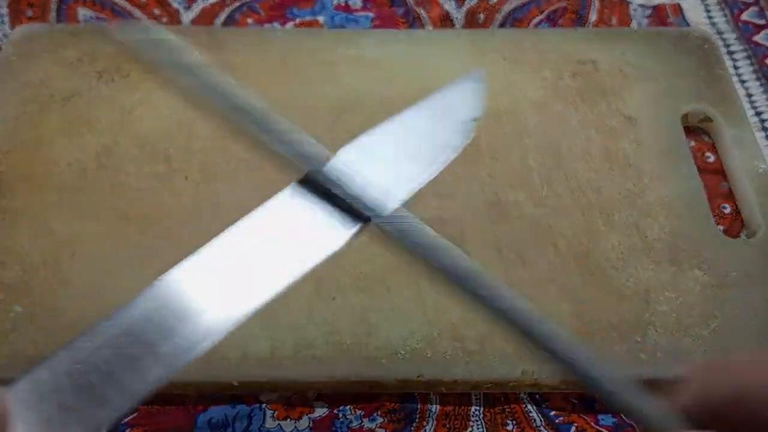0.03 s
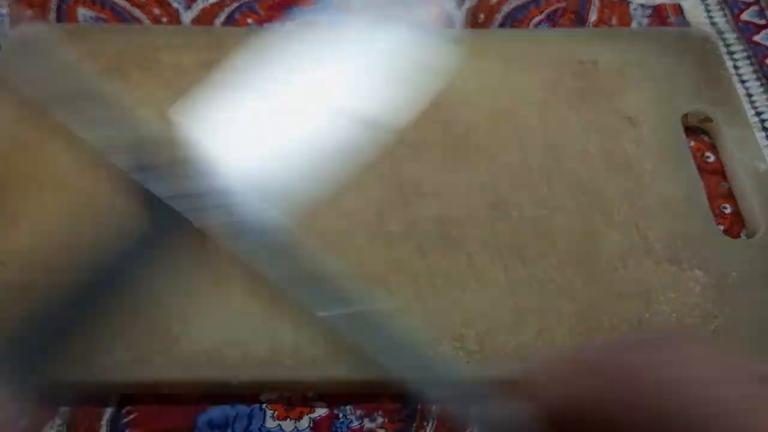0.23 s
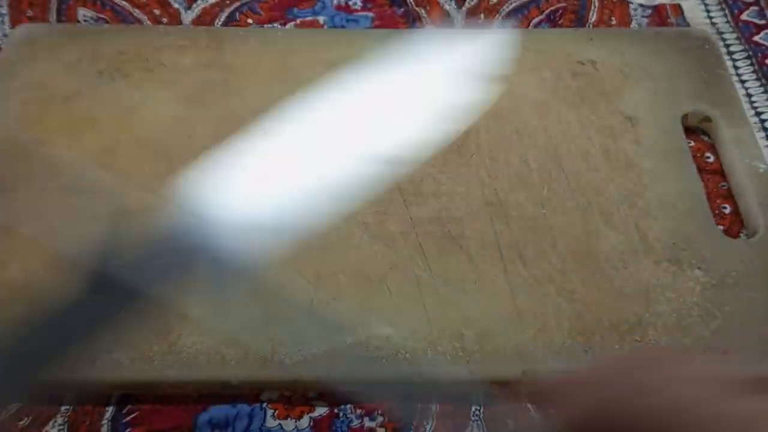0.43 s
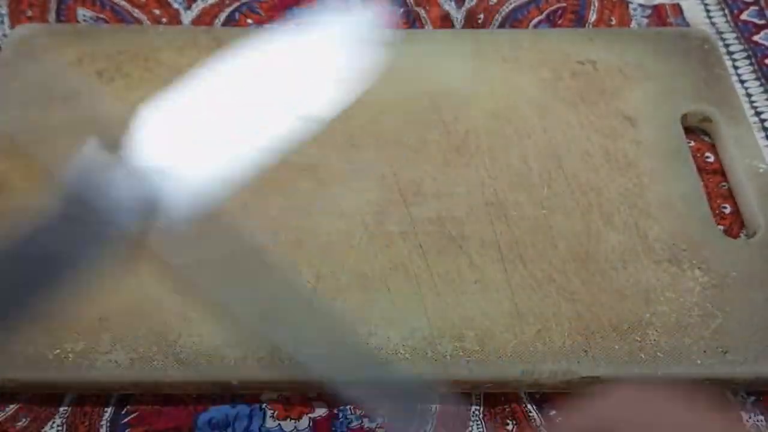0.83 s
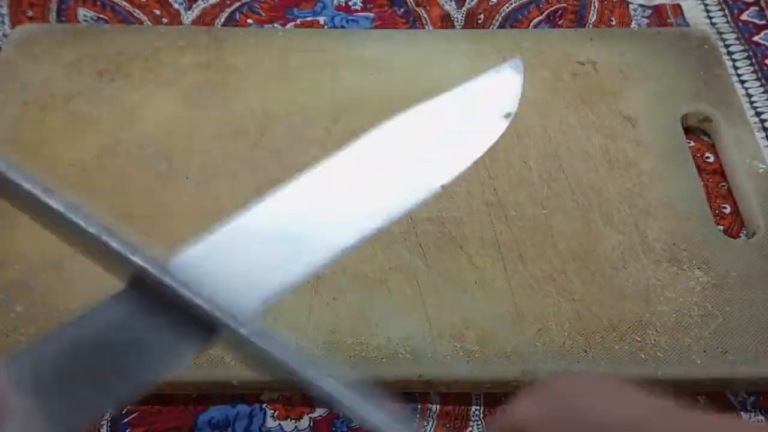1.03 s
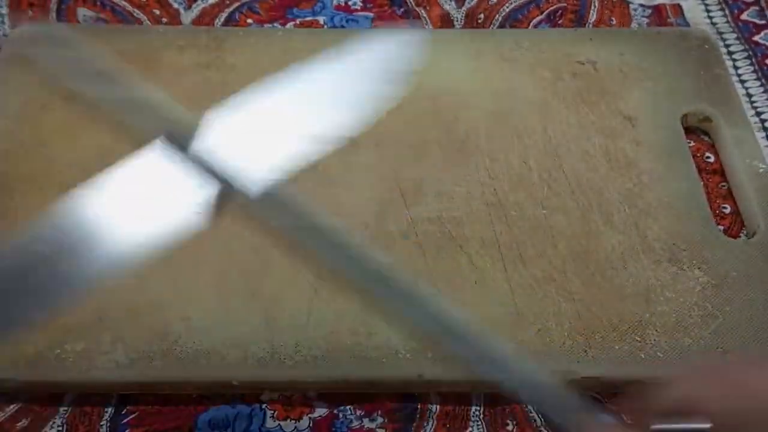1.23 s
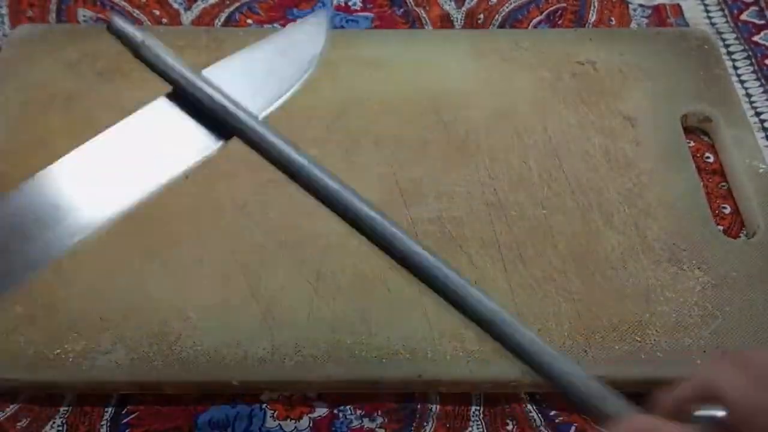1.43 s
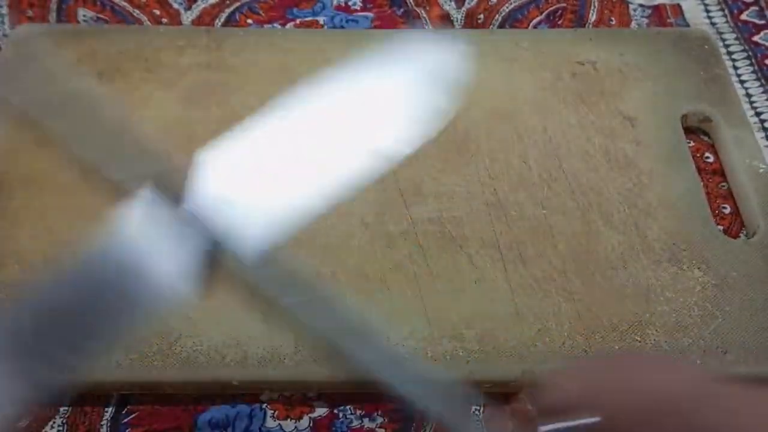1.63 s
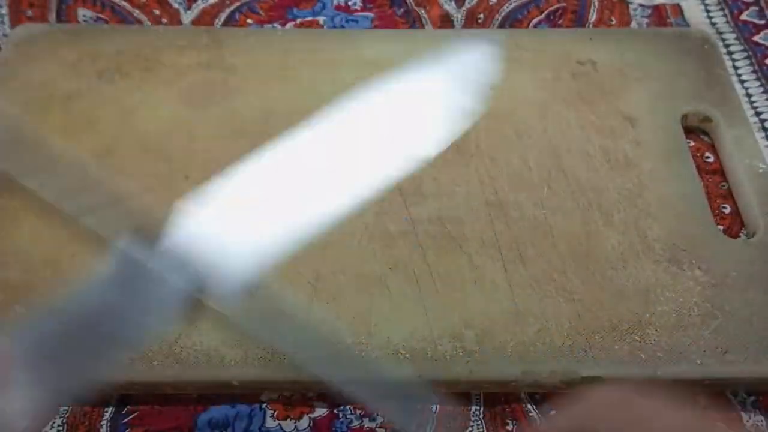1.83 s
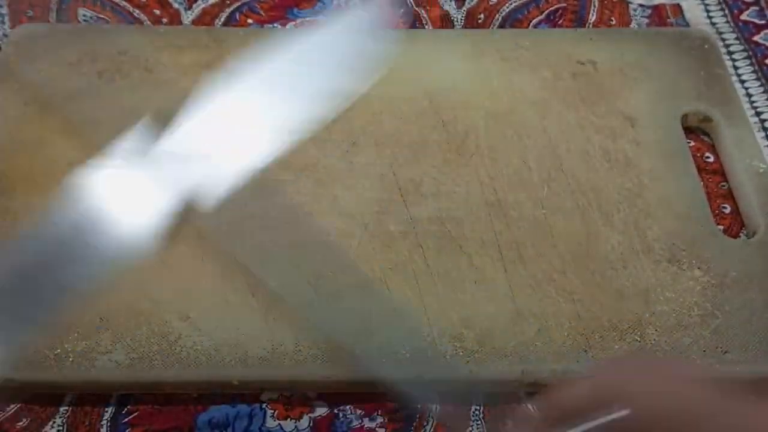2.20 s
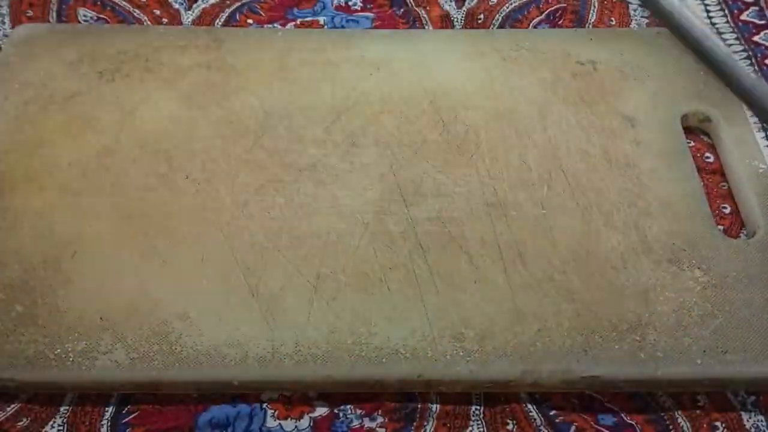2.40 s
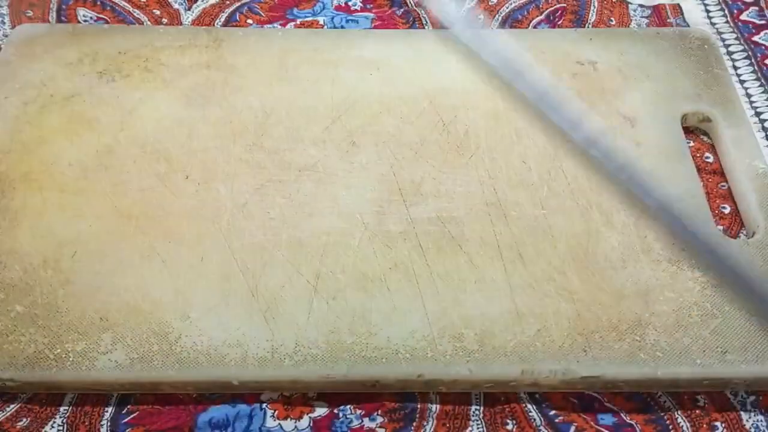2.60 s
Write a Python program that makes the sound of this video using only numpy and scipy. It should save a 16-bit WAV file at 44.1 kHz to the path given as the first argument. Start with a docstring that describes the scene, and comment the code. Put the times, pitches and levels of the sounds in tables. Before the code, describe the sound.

Quick, rasping metal strokes of a knife being honed on a steel, with scattered clicks and zings, heard up close over faint kitchen room noise. It ends with a sharp clack and a brief ring as the blade comes free.

```python
"""A small kitchen, close by: a knife is stroked quickly up and down a honing steel.
Tiny slips of the edge ring the blade's fixed resonances and the steel's gliding ones, which follow
the point of contact. The edge knocks, squeals and zings now and then; the held tools hum and thud.
The blade leaves the steel with a clack and a short ring, over faint room noise."""
import sys
import numpy as np
from scipy import signal
from scipy.fft import rfft, irfft
from scipy.io import wavfile
from scipy.ndimage import uniform_filter1d

SR = 44100
rng = np.random.default_rng(int(sys.argv[2]) if len(sys.argv) > 2 else 0)


def to_wav(sig):
    """Store sig (one row per channel, or 1-D mono) as 16-bit WAV at the path in sys.argv[1].

    Samples outside -1..1 are clipped; the rate is SR.
    """
    pcm = np.clip(np.atleast_2d(sig), -1, 1) * 32767
    pcm = np.round(pcm).astype(np.int16)
    wavfile.write(sys.argv[1], SR, pcm.T)  # frames by channels


N = 121275
t = np.arange(N) / SR

# still-air spectrum: f/Hz, relative density/dB
AIR_SPECTRUM = [(25, -5), (60, -15.5), (110, -3), (200, -4.5), (350, -3.5), (550, -12), (900, -13.5),
                (3000, -21), (15000, -48)]
# kitchen decay: f/Hz, T60/s
ROOM_DECAY = [(200, 0.2), (1000, 0.36), (3500, 0.44), (7000, 0.41), (11000, 0.45), (15000, 0.11)]
# jolts from the hands: t/s, level/dB
THUDS = [(.43, -64.5), (1.02, -66), (1.671, -49), (1.825, -61), (1.86, -58), (2.116, -68), (2.42, -63)]
# low resonances of the held tools: centre t/s, half length/s, f/Hz, level/dB
HUMS = [(.03, 0.076, 361, -68), (.18, 0.013, 796, -52), (.365, 0.018, 403, -52.5), (.665, 0.019, 332, -54),
        (.84, 0.015, 641, -58), (1.16, 0.044, 575, -61.5), (1.4, 0.025, 690, -55.5),
        (1.35, .06, 524.4, -52.5), (1.88, .03, 527, -59), (2.42, 0.061, 338, -58.5),
        (2.433, 0.011, 596.5, -38.5), (2.465, 0.027, 655, -48.5)]
# modes of the freed blade and steel: f/Hz, level/dB, T60/s
FREE_MODES = [(658, -41, .19), (1093, -52, .2), (2180, -47, .25), (2562, -50, .33), (3408, -47, .36),
              (3705, -46, .28), (3845, -42, .34), (4551, -59, 1.1), (6250, -47, .34), (7106, -53, .22),
              (7935, -54, .27), (8350, -62, .9), (11300, -55, .2), (13580, -61, .2)]
# edge catches: centre t/s, half length/s, f/Hz, level/dB
SQUEALS = [(.207, .013, 1370, -29.5), (.43, 0.005, 3700, -16), (.552, 0.0031, 3930, -43),
           (.70, 0.0087, 2260, -21.5), (.742, 0.0032, 3620, -14.5), (.945, 0.011, 2260, -27.5),
           (1.437, 0.0061, 3520, -27.5), (1.503, 0.01, 3520, -34), (1.673, 0.0031, 3950, -17),
           (1.738, .02, 2270, -39.5), (1.777, 0.0071, 2300, -23), (2.112, 0.0057, 3780, -22),
           (2.3825, 0.0038, 3780, -18), (2.407, 0.0059, 8000, -22.5)]
# hand reversals: t/s, main gliding mode f/Hz
TURNS = [(.16, 6200), (.335, 2150), (.487, 7400), (.645, 2000), (.79, 6500), (.925, 2220), (1.085, 6300),
         (1.205, 2650), (1.33, 6800), (1.475, 2450), (1.62, 7000), (1.755, 2100), (1.88, 7800),
         (2.03, 2350), (2.172, 6400), (2.305, 2150), (2.445, 7000)]
# main gliding mode locks: centre t/s, half length/s, level/dB
ZINGS = [(.522, .012, -36), (.85, .015, -34), (1.04, .01, -33), (1.39, .012, -35), (1.552, .016, -31),
         (1.832, .012, -31), (1.942, .011, -36)]
# broad blade response: f/Hz, relative level/dB
BLADE_COLOUR = [(40, -31), (250, -28), (480, -24.5), (700, -21.5), (880, -5), (1200, -7.5), (1620, -10.5),
                (2000, 2), (2800, 4.5), (4200, 5), (5100, 2.5), (7200, -5), (8500, -6.5), (9800, -14),
                (13000, -14), (16000, -14.5)]
# fixed blade resonances: f/Hz, width/Hz, lift/dB
BLADE_MODES = [(1040, 125, 5.5), (1413, 55, 16.5), (1864, 54, 1.5), (2281, 111, 8.5), (3096, 20, 1),
               (3546, 320, 6), (3754, 102, 2), (5750, 200, 8.5), (6560, 240, 8), (6750, 146, 8.5),
               (7760, 470, 4), (9030, 120, 6.5)]
# edge hits steel: t/s, relative level/dB, low-band offset/dB, hiss offset/dB
KNOCKS = [(.1002, -20.5, 13, 2.5), (.1955, -40.5, 3, -7), (.285, -26, -5, -5.5), (.427, -14.5, 18.5, -17),
          (.447, -21, 3, -21), (.5492, -24, -20, -5), (.57, -30, -11, -7), (.7357, -11, 18, -10),
          (.7997, -23, -9, 6), (.823, -38, 2, -5), (.8365, -28, 19, -25), (1.011, -15, 8.5, 0),
          (1.0815, -17.5, -5, 12), (1.2272, -11, -2, -15), (1.259, -18, 15, 4), (1.2925, -13, 6, 9),
          (1.3565, -25.5, -18, -1), (1.6285, -41, -12, -9.5), (1.6711, -22, -3, -10), (1.7235, -11, 2, -2),
          (1.7715, -14.5, 10.5, -5), (1.858, -14, -17, 12.5), (2.109, -23.5, -0.5, -1),
          (2.3347, -33.5, 19, -11), (2.4205, -17, -6.5, -1), (2.4239, -5.5, 5, 8), (2.4271, -5, -5.5, -4.5)]
# gliding steel modes: ratio to main mode, width/Hz, relative level/dB
STEEL_MODES = [(.29, 40, -7), (.51, 40, -6), (1, 45, -2), (1.56, 60, -8), (2.08, 70, -8), (2.95, 90, -7)]
# strokes: start t/s, swell end t/s, end t/s, bite time/s, relative bite level/dB,
# relative swell level/dB, low-band offset/dB, hiss offset/dB
STROKES = [(0.164, 0.18, .19, .008, -57, -45.5, -5, -3), (0.19, 0.229, 0.35, 0.0077, -31.5, -32, 5, 6.5),
           (0.346, 0.44, 0.5, .025, -35.5, -22.5, 11, 5), (0.508, 0.545, 0.65, 0.01, -31.5, -21.5, 9, 3.5),
           (0.647, 0.757, 0.76, 0.033, -32.5, -21, 3, 7.5),
           (0.795, 0.871, 0.91, 0.0035, -26, -29.5, 5.5, 0), (0.928, 1.05, 1.048, 0.03, -31.5, -25.5, 1, 7),
           (1.065, 1.088, 1.242, 0.03, -27, -25.5, 1.5, 5.5),
           (1.209, 1.32, 1.322, 0.017, -28, -24.5, -4, 1.5),
           (1.346, 1.346, 1.47, 0.013, -25, -26.5, 3.5, 3.5), (1.482, 1.559, 1.61, 0.011, -43, -25.5, 6, 2),
           (1.62, 1.642, 1.784, 0.0067, -30.5, -25.5, 0.5, 3),
           (1.762, 1.789, 1.837, 0.012, -28, -21, 1.5, 1.5),
           (1.816, 1.853, 1.895, .01, -29.5, -24, -1.5, 0),
           (1.899, 1.987, 2.029, 0.031, -29.5, -31, 7.5, -0.5),
           (2.037, 2.13, 2.164, 0.013, -38, -25, 6.5, -0.5),
           (2.19, 2.264, 2.302, 0.016, -29.5, -29, 5.5, -4.5),
           (2.32, 2.391, 2.486, .015, -37.5, -23.5, 5.5, 3)]

MID_PITCH_HZ = 3700


def amp(db):
    """Decibels to gain."""
    return 10 ** (np.asarray(db) / 20)


def unit(x):
    """Scale to rms 1."""
    return x / np.sqrt(np.mean(x ** 2) + 1e-20)


def log_interp(points, hz):
    """Table lookup on a log-frequency axis."""
    f, value = np.transpose(points)
    return np.interp(np.log(hz + 1), np.log(f + 1), value)


def slow_noise(cutoff_hz, shape=N):
    """Low-passed noise, rms 1."""
    lowpass = signal.butter(2, cutoff_hz, fs=SR, output="sos")
    return unit(signal.sosfilt(lowpass, rng.standard_normal(shape)))


def resonate(x, hz, width_hz):
    """Resonator tracking the pitch hz."""
    carrier = np.exp(2j * np.pi * np.cumsum(hz * np.ones(len(x))) / SR)
    pole = np.exp(-np.pi * width_hz / SR)
    return 2 * (carrier * signal.lfilter([1 - pole], [1, -pole], x / carrier + 1e-18)).real


def split_bands(x, low_hz=1506, hiss_hz=7740):
    """Low, middle and hiss bands; they sum to x."""
    hz, spectrum = np.fft.rfftfreq(N, 1 / SR), rfft(x)
    low = irfft(spectrum / (1 + (hz / low_hz) ** 8), N)
    hiss = irfft(spectrum * (1 - 1 / (1 + (hz / hiss_hz) ** 8)), N)
    return low, x - low - hiss, hiss


def pulse(centre_s, half_s):
    """Gaussian envelope, 1/e at half_s from the centre."""
    return np.exp(-((t - centre_s) / half_s) ** 2)


def wavering_tones(table, width_hz):
    """Brief tones with random-walk phase."""
    out = np.zeros(N)
    for centre_s, half_s, hz, db in table:
        on = abs(t - centre_s) < 3 * half_s
        drift = np.cumsum(rng.standard_normal(N)[on]) * np.sqrt(2 * np.pi * width_hz / SR)
        phase = 2 * np.pi * hz * t[on] + uniform_filter1d(drift, size=100)
        out[on] += amp(db) * np.sqrt(2) * pulse(centre_s, half_s)[on] * np.sin(phase)
    return out


def air(level_db=-73.5):
    """Faint steady room noise."""
    gain = amp(log_interp(AIR_SPECTRUM, np.fft.rfftfreq(N, 1 / SR)))
    return amp(level_db) * unit(irfft(rfft(rng.standard_normal(N)) * gain, N))


def kitchen_reverb(x, gap_s=0.0033):
    """Short diffuse tail; each band decays at its own rate."""
    hz, age_s, noise = signal.stft(rng.standard_normal(SR // 2), SR, nperseg=256)
    tail = signal.istft(noise * amp(-60 * age_s / log_interp(ROOM_DECAY, hz)[:, None]), SR)[1]
    tail *= np.clip(t[:len(tail)] / gap_s - 1, 0, 1)
    return signal.fftconvolve(x, tail / np.linalg.norm(tail))[:N]


def thuds():
    """Soft low bumps through the handles."""
    return slow_noise(cutoff_hz=87.8) * sum(amp(db) * pulse(at_s, half_s=.012) for at_s, db in THUDS)


def hums():
    """Dull low resonances of the held tools."""
    return wavering_tones(HUMS, width_hz=21)


def release_ring(release_s=2.425):
    """Free modes decay once the blade leaves the steel."""
    age_s = np.maximum(t - release_s, 0)
    return sum(amp(db - 60 * age_s / t60_s) * np.sin(2 * np.pi * hz * age_s)
               for hz, db, t60_s in FREE_MODES)


def squeals():
    """The edge catches and squeals briefly."""
    return wavering_tones(SQUEALS, width_hz=38)


def contact_pitch_hz():
    """The contact swings smoothly between turns; pitch goes as 1 / free length squared."""
    turn_s, hz = np.transpose(TURNS)
    index = np.arange(len(turn_s))
    progress = np.interp(t, turn_s, index)
    eased = np.floor(progress) + (1 - np.cos(np.pi * (progress % 1))) / 2
    free_length = np.interp(eased, index, hz ** -.5)
    return free_length ** -2


def zings(flutter_depth=0.79):
    """The main gliding mode locks into a fluttering whistle."""
    phase_flutter, gain_flutter = flutter_depth * slow_noise(cutoff_hz=146, shape=(2, N))
    tone = np.sin(2 * np.pi * np.cumsum(contact_pitch_hz()) / SR + phase_flutter) * (1 + gain_flutter)
    return unit(tone) * sum(amp(db) * pulse(at_s, half_s) for at_s, half_s, db in ZINGS)


def blade(force):
    """Force rings the blade's fixed resonances: minimum-phase filter, unit energy."""
    hz = np.fft.rfftfreq(8192, 1 / SR)
    peaks = sum((amp(db) ** 2 - 1) / (1 + (2 * (hz - mode_hz) / width_hz) ** 2)
                for mode_hz, width_hz, db in BLADE_MODES)
    gain = amp(log_interp(BLADE_COLOUR, hz)) * np.sqrt(1 + peaks)
    log_gain = np.log(np.r_[gain, gain[-2:0:-1]])
    spectrum = np.exp(np.conj(signal.hilbert(log_gain)))
    response = np.fft.ifft(spectrum).real[:len(hz)]
    return signal.oaconvolve(force, response / np.linalg.norm(response))[:N]


def knocks(gain_db=-6.5, t60_s=0.023, highpass_hz=650):
    """The edge hits the steel: a snap, then milliseconds of rattle."""
    drives = np.zeros((3, N))  # low, middle, hiss
    age_s = t[:SR // 10]
    for at_s, db, low_db, hiss_db in KNOCKS:
        at = round(at_s * SR)
        burst = rng.choice([-1., 1.], len(age_s)) * amp(-60 * age_s / t60_s)
        burst[0] = 0.83  # snap
        drives[:, at:at + len(age_s)] += amp(db + np.array([[low_db], [0], [hiss_db]])) * burst
    blows = sum(split_bands(drive)[band] for band, drive in enumerate(drives))
    highpass = signal.butter(2, highpass_hz, "high", fs=SR, output="sos")
    return amp(gain_db) * signal.sosfilt(highpass, blows)


def node_gain(octave, phase_cycles, nodes_per_octave=1.15, depth=.85):
    """A mode fades as the contact passes its nodes."""
    return 1 + depth * np.sin(2 * np.pi * (nodes_per_octave * octave + phase_cycles))


def steel_modes(force, octave):
    """Steel modes glide steeply with the contact."""
    out = np.zeros(N)
    for ratio, width_hz, db in STEEL_MODES:
        hz = np.minimum(ratio * MID_PITCH_HZ * 2 ** octave, SR / 2)
        out += amp(db) * unit(resonate(force, hz, width_hz)) * node_gain(octave, np.log2(ratio) + 1 / 4)
    return unit(out)


def bending_modes(force, octave, count=36, lowest_hz=1018.2, step_hz=429.5):
    """A crowd of blade modes bends gently with the contact."""
    mid_bend_hz_per_octave, tilt_db_per_octave = 680, -1.5
    out = np.zeros(N)
    for k, (offset, phase) in enumerate(rng.random((count, 2))):
        rest_hz = lowest_hz + step_hz * (k + (offset - .5) * min(k / 10, 1))
        hz = rest_hz + mid_bend_hz_per_octave * np.sqrt(rest_hz / MID_PITCH_HZ) * octave
        gain = amp(tilt_db_per_octave * np.log2(rest_hz / MID_PITCH_HZ))
        out += gain * resonate(force, hz, width_hz=38) * node_gain(octave, phase + t)
    return unit(out)


def slip_force(slips_per_s=1800, spread_db=3, smooth_gain=0.44):
    """Random micro-slips of the edge plus smooth friction noise."""
    slips = (rng.random(N) < slips_per_s / SR) * rng.choice([-1, 1], N)
    sizes = amp(spread_db * np.minimum(rng.exponential(1, N), 4))
    return unit(unit(slips * sizes) + smooth_gain * rng.standard_normal(N))


def chatter(depth_db=1.5, tau_s=0.0058):
    """Fast flicker of contact pressure."""
    flicker = unit(signal.lfilter([1], [1, -np.exp(-1 / (tau_s * SR))], rng.standard_normal(N)))
    return unit(amp(depth_db * np.clip(flicker, -1.4, 1.4)))


def friction_bands(steel_db=-4.5, bending_db=-.5, direct_db=-17.5, grit_db=-5):
    """Chattering slips ring the moving modes; hiss rises with glide speed."""
    force, pressure = slip_force(), chatter()
    octave = np.log2(contact_pitch_hz() / MID_PITCH_HZ)
    speed = unit(abs(np.gradient(octave)))
    modes = amp(steel_db) * steel_modes(force, octave) + amp(bending_db) * bending_modes(force, octave)
    low, middle, hiss = split_bands((modes + amp(direct_db) * force) * pressure)
    grit = split_bands(force * pressure)[2]
    return low, middle, (hiss + amp(grit_db) * grit) * amp(2.5 * (speed - 2))


def scrape(gain_db=-3.5, fade_to_db=-46, lift_s=0.0041, hiss_lift_db=1, hiss_db_per_db=0.28):
    """Each stroke bites, swells and fades; hiss grows with the stroke's level."""
    low, middle, hiss = friction_bands()
    out = np.zeros(N)
    for start_s, top_s, end_s, bite_s, bite_db, top_db, low_db, hiss_db in STROKES:
        on = (t > start_s) & (t < end_s + lift_s)
        now_s = t[on]
        swell = np.clip((now_s - start_s) / max(top_s - start_s, .002), 0, 1) ** 1.8
        fade = np.clip((now_s - top_s) / max(end_s - top_s, .002), 0, 1) ** 1.2
        db = bite_db + (top_db - bite_db) * swell + (fade_to_db - top_db) * fade
        bite = np.clip((now_s - start_s) / bite_s, 0, 1)
        lift = np.clip((end_s + lift_s - now_s) / lift_s, 0, 1)
        hiss_gain = amp(hiss_lift_db + hiss_db + hiss_db_per_db * (db - top_db))
        out[on] += bite * lift * amp(db) * (amp(low_db) * low[on] + middle[on] + hiss_gain * hiss[on])
    return amp(gain_db) * out


def scene(reverb_db=-13.5):
    """Knife and steel in the kitchen, mono."""
    metal = blade(scrape() + knocks()) + squeals() + hums() + zings() + release_ring() + thuds()
    return (metal + amp(reverb_db) * kitchen_reverb(metal) + air())[None]


def record(dry, cutoff_hz=15850):
    """Steep low-pass band limit."""
    lowpass = signal.firwin(511, cutoff_hz, window=("kaiser", 9), fs=SR)
    return signal.oaconvolve(dry, lowpass[None], "same")


dry = scene()
out = record(dry)
to_wav(out)
```